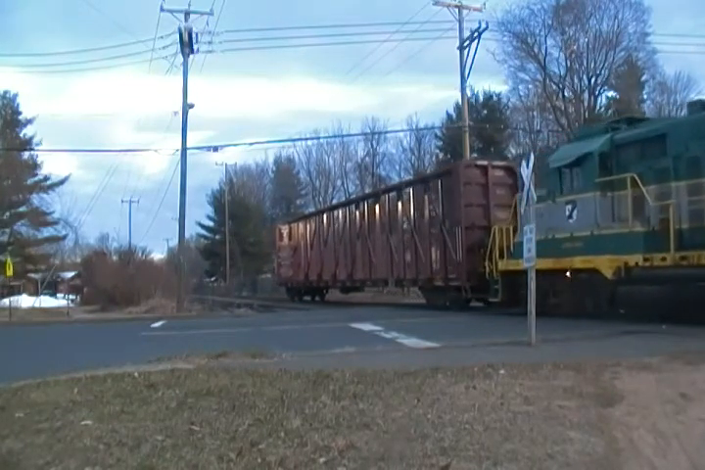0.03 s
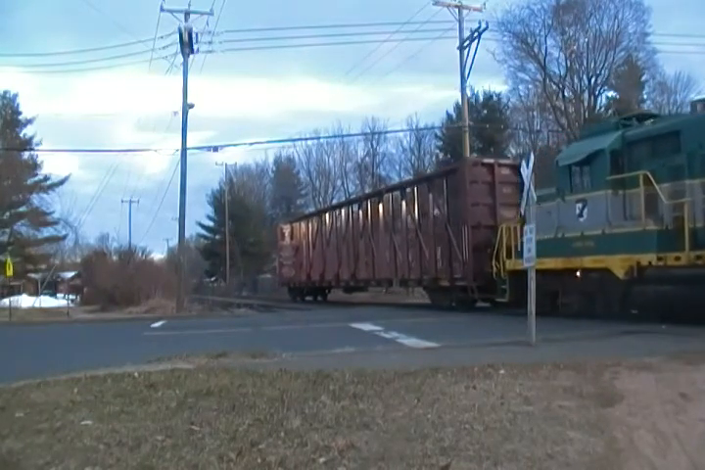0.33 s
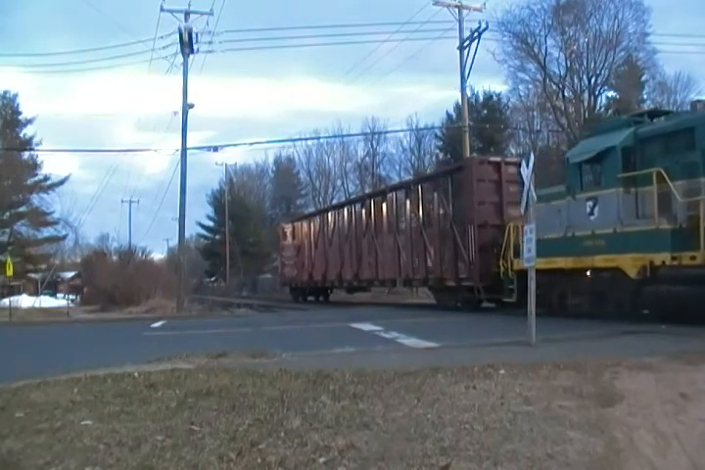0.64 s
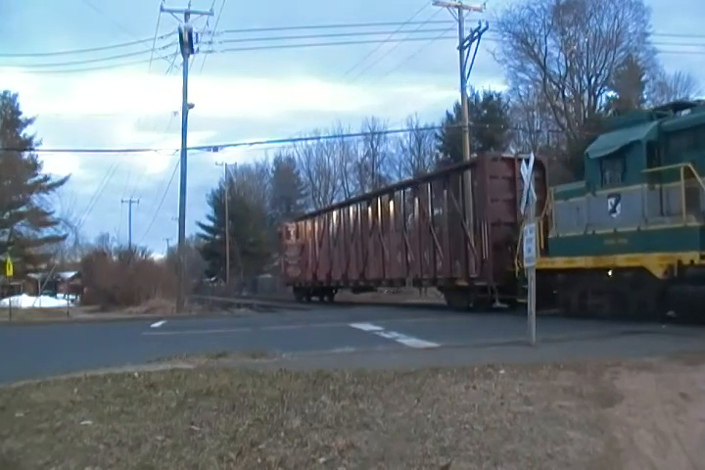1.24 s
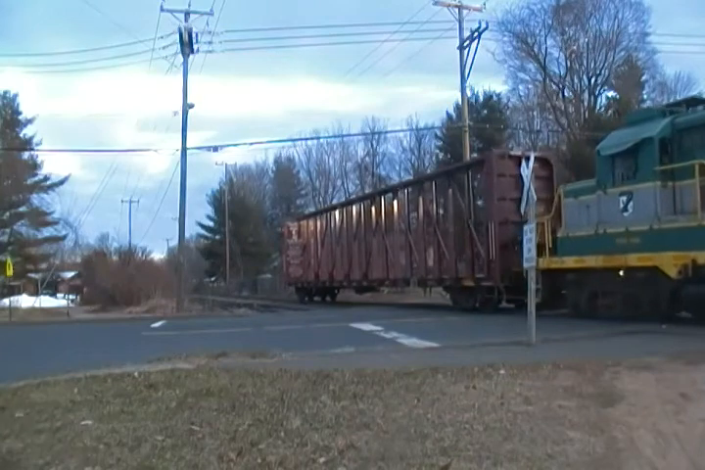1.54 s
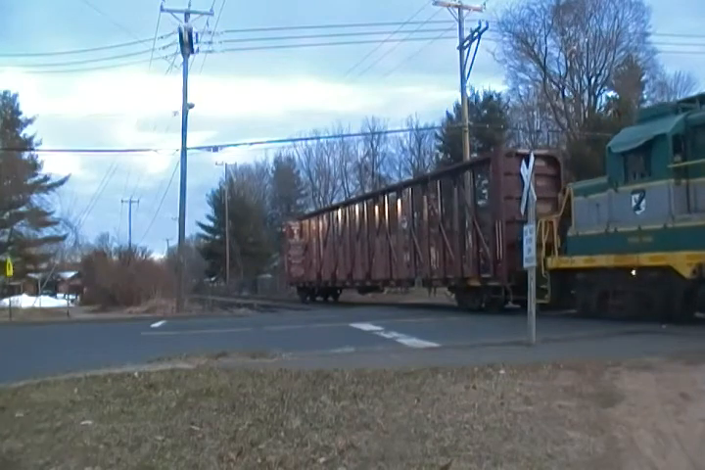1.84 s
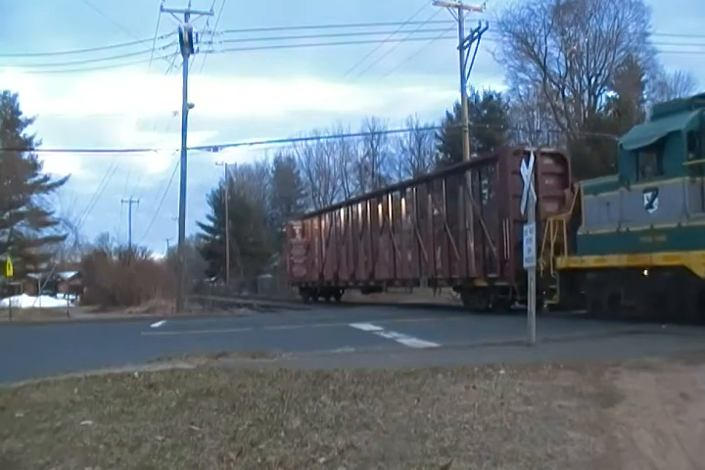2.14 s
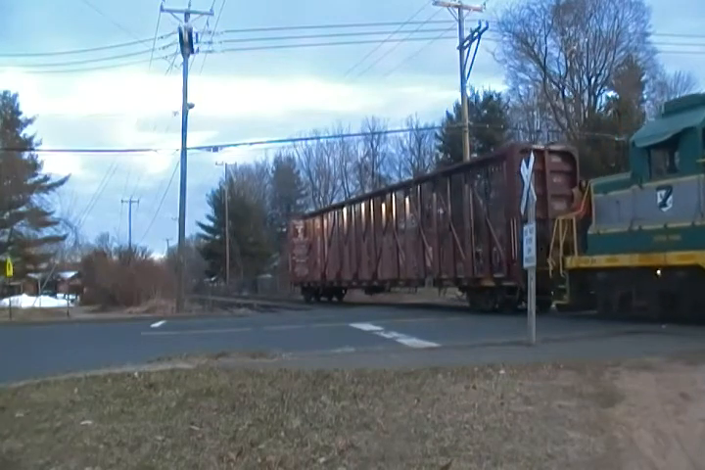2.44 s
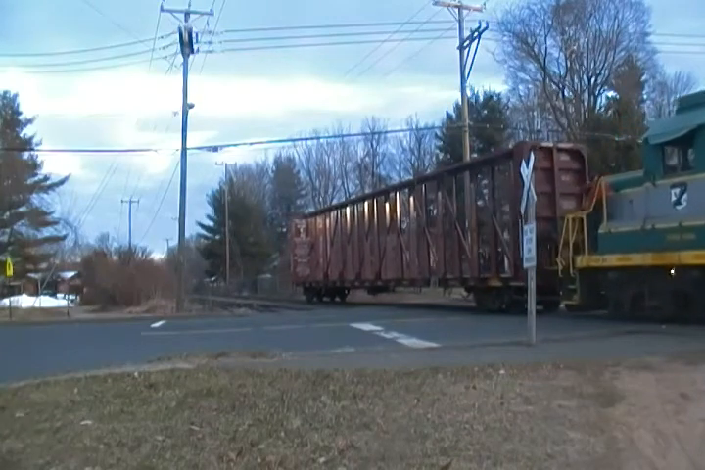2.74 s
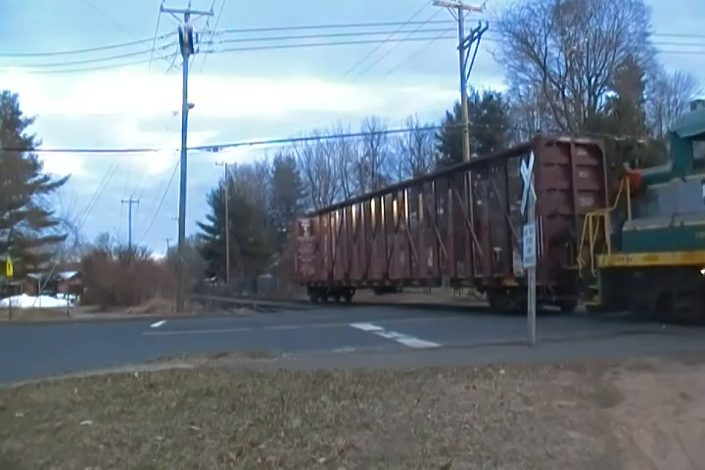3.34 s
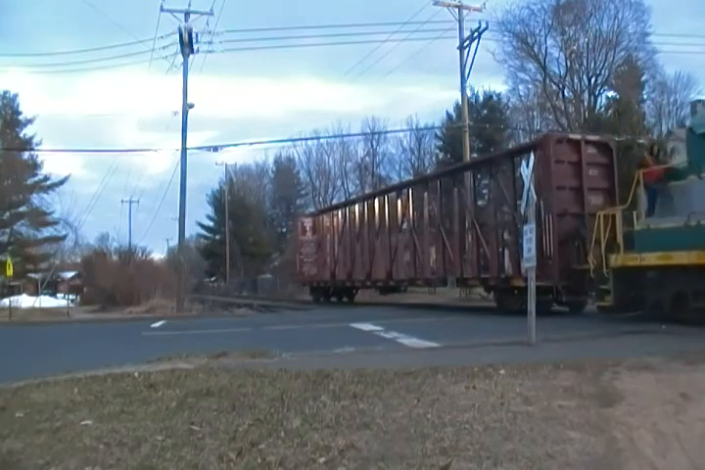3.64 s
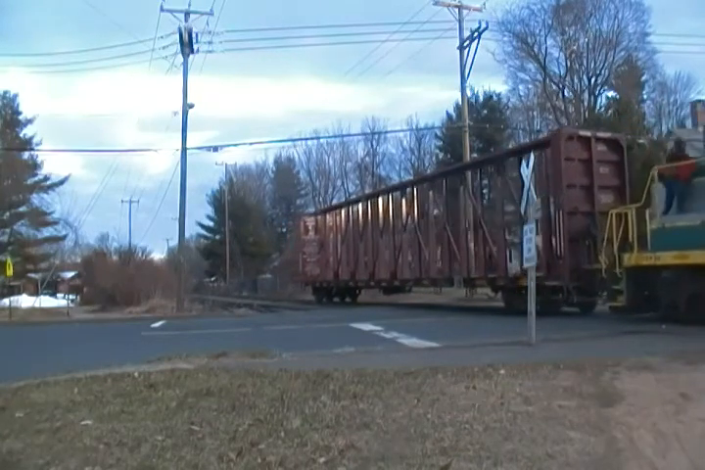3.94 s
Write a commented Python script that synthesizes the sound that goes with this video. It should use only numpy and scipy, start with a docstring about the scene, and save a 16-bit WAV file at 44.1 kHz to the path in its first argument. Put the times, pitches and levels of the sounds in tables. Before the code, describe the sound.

A diesel locomotive throbs and slowly speeds up while its bell rings in even strokes.

```python
"""A diesel locomotive creeps over a road crossing with a freight car, heard from the roadside in open air.
The engine slowly speeds up: eight uneven firings per cycle make a deep throb with puffs of exhaust noise,
while a blower whine and a hiss climb with it. The bell strikes about every 0.63 s: a clapper knock, then
beating pairs of modes over a lasting hum. One faint, high squeak passes."""
import sys
import numpy as np
from scipy import signal
from scipy.io import wavfile

SR = 44100
rng = np.random.default_rng(int(sys.argv[2]) if len(sys.argv) > 2 else 0)


def int16_out(signal):
    """Quantize to a 16-bit WAV file."""
    q = np.round(np.clip(np.atleast_2d(signal).T, -1, 1) * 32767)
    wavfile.write(sys.argv[1], SR, q.astype(np.int16))


N = 176400
T = np.arange(N) / SR
CYLINDERS, FIRING_PEAK = 8, 0.637  # peak as a fraction of the firing period
SIDE = np.array([[1], [-1]])

# Bell strokes. Each row: start in seconds, level in dB, ring time factor, extra dB of clang, strike note,
# chime and treble, strike note's twin mode in dB, extra treble pan in dB L-R.
STROKES = [(-.37, 3.5, 1.01, 0, -3.5, -2, -2.3, -8, 3), (0.2646, -1.5, 1.07, -4.5, 1, -5.5, -4, -14.5, 2.5),
           (0.8982, -0.5, 0.95, 0, -3, -3, 0.99, -3, 1.5),
           (1.543, -0.5, 1.094, -10, -7.5, 2, 0.078, -19, -5),
           (2.179, -3, 0.96, -6, -3.5, 1.5, 2.2, -5, 0.5),
           (2.8071, -1.5, 1.14, -9.5, -3, 7, 0.71, -6.5, 1.5),
           (3.4335, 0.5, 0.74, 1, -4.5, 7, 4.2, -3, 1.5)]


def from_db(db):
    """Decibels to gain."""
    return 10 ** (np.asarray(db) / 20)


def unit_rms(x):
    """Scale to rms 1."""
    return x / np.sqrt(np.mean(np.abs(x) ** 2) + 1e-20)


def in_time(rows):
    """Breakpoints interpolated at every sample."""
    return np.interp(T, *np.transpose(rows))


def at_hz(rows, hz):
    """Breakpoints interpolated over log frequency."""
    row_hz, values = np.transpose(rows)
    return np.interp(np.log(hz), np.log(row_hz), values)


def pan(db):
    """Stereo gains for an L-R level difference."""
    return from_db(SIDE * db / 2)


def drift(rate_hz):
    """Slow random signal, rms 1."""
    step, settle = 20, 4000
    pole = np.exp(-2 * np.pi * step * rate_hz / SR)
    white = rng.standard_normal(N // step + settle + 2)
    slow = signal.lfilter([1], [1, -2 * pole, pole * pole], white)[settle:]
    return np.interp(np.arange(N) / step, np.arange(len(slow)), unit_rms(slow))


def flutter(rate_hz):
    """Random amplitude and phase, rms 1."""
    return unit_rms(drift(rate_hz) + 1j * drift(rate_hz))


def banded_noise(spectrum, flicker_db):
    """Stereo noise in separately flickering third octaves, rms 1."""
    # Each row: frequency in Hz, L-R correlation.
    correlation = [(60, 0.99), (300, .9993), (1000, 0.99), (2500, 0.89), (5000, 0.6), (10000, 0)]
    edges_hz = 20 * 2 ** np.arange(0, 9.5, 1 / 3)
    out, white = 0, rng.standard_normal((2, 2, N))
    for k, (low, high) in enumerate(zip(edges_hz, edges_hz[1:])):
        if spectrum[0][0] < high and low < spectrum[-1][0]:
            hz = np.sqrt(low * high)
            band = signal.butter(2, [low, high], "band", fs=SR, output="sos")
            mid, side = signal.sosfilt(band, white[k % 2])
            alike = at_hz(correlation, hz)
            gain = from_db(at_hz(spectrum, hz) + flicker_db * drift(5.9))
            out = out + gain * (np.sqrt(1 + alike) * mid + np.sqrt(1 - alike) * side * SIDE)
    return unit_rms(out)


def exhaust_tone(firings):
    """One pressure swing per firing; unequal cylinders make it throb, less so as it speeds up."""
    # Strength of each firing of a cycle in dB, before scaling by unevenness.
    cylinder_db = [-2, -4.5, -0.5, 1.5, 1, 0.15, 0.3, -2.5]
    # Each row: time in seconds, tone level in dB.
    tone_db = [(0, -15.5), (1.3, -14), (2.6, -13.8), (4, -14.5)]
    # Each row: time in seconds, second harmonic in dB re the first.
    overtone_db = [(0, -19), (1, -22.5), (2, -20.5), (2.8, -14), (3.3, -12), (4, -21)]
    position = firings - FIRING_PEAK
    unevenness = np.linspace(2, 1, N)
    throb_db = unevenness * np.interp(position, np.arange(CYLINDERS), cylinder_db, period=CYLINDERS)
    phase = 2 * np.pi * (position + 0.009 * drift(35))  # timing jitter
    wave = np.cos(phase) - from_db(in_time(overtone_db)) * np.sin(2 * phase)
    tone = np.sqrt(2) * wave * from_db(in_time(tone_db) + throb_db - 0.38 * drift(11))
    highpass = signal.butter(4, 39, "high", fs=SR, output="sos")
    return signal.sosfiltfilt(highpass, tone, padlen=SR // 10)


def engine_noise(firings):
    """Exhaust gas, machinery and rumble swell once per cycle; the gas also pulses with each firing."""
    # Spectra. Each row: frequency in Hz, relative density in dB.
    gas_spectrum = [(180, -3), (250, -9), (320, -3.5), (400, -0.5), (440, 3.5), (520, 1.5), (620, -3),
                    (720, -0.5), (800, -6), (900, -34.5), (1050, -37)]
    machinery_spectrum = [(600, 7.5), (900, 2), (1300, 0), (1700, 0), (2200, -1), (2800, -10.5),
                          (4000, -10.5), (5200, -22.5), (7000, -18), (8500, -30), (10500, -30.5),
                          (12000, -50)]
    rumble_spectrum = [(20, -34), (35, -18), (50, -6.5), (90, 3.5), (125, 0.5), (160, -8), (220, -14.5),
                       (320, -28)]
    # Envelopes. Each row: time in seconds, base level in dB.
    gas_db = [(0.0, -28), (0.05, -31), (0.62, -29), (0.65, -25.5), (1.04, -31.5), (1.05, -29),
              (2.36, -30.5), (3.39, -26), (4.0, -27)]
    machinery_db = [(0, -39.5), (1.2, -37), (2.2, -39.5), (2.8, -38), (3.35, -33), (3.6, -36), (4, -32.5)]
    rumble_db = [(0, -29.5), (.8, -28.5), (1.4, -26), (2.2, -31.5), (2.8, -33.5), (3.3, -26), (4, -24.5)]
    swell = np.cos(2 * np.pi * (firings / CYLINDERS - 0.31))
    pulse = np.cos(2 * np.pi * (firings - FIRING_PEAK))
    gas = banded_noise(gas_spectrum, flicker_db=1.5)
    machinery = banded_noise(machinery_spectrum, flicker_db=0.8)
    rumble = banded_noise(rumble_spectrum, flicker_db=-3.9)
    return (gas * from_db(in_time(gas_db) - 1.3 + 2 * swell + 1.5 * pulse)
            + machinery * from_db(in_time(machinery_db) + 2.3 * swell)
            + rumble * from_db(in_time(rumble_db) + 3.7 * swell))


def blower(firings):
    """Wavering whines and a narrow hiss, geared to the engine and growing as it nears."""
    # Each row: multiple of the firing rate, final level in dB.
    whines = [(19.75, -41.5), (29.62, -41), (49.4, -77), (70.3, -55)]
    whine_db_per_s, hiss_db_per_s, hiss_multiple = 6.5, 1.5, 106
    remaining_s = T[-1] - T
    whine = 0
    for multiple, db in whines:
        tone = (flutter(7.4) * np.exp(2j * np.pi * multiple * firings)).real
        whine += from_db(db - whine_db_per_s * remaining_s) * tone
    carrier = np.exp(2j * np.pi * hiss_multiple * firings)
    mid, side = [(flutter(130) * carrier).real for _ in range(2)]
    hiss = from_db(-56.5 - hiss_db_per_s * remaining_s) * (mid + 0.4 * side * SIDE)
    return np.sqrt(2) * (whine + hiss)


def bell_partial(hz, db, t60_s, split_hz, twin_db, pan_db, stroke_db, stroke_pan_db=0, twin_lag_s=0):
    """A beating mode pair; each stroke takes over from the last. Scattering makes high ones waver."""
    attack_s, takeover_s, bloom_s, bloom_gain = 0.0015, 0.03, 0.037, from_db(-16)
    starts_s, _, ring_factors = np.transpose(STROKES)[:3]
    ends_s = np.append(starts_s[1:], T[-1])
    strokes = np.broadcast(starts_s, ends_s, t60_s * ring_factors, stroke_db, twin_db, stroke_pan_db)
    ring = np.zeros((2, N), complex)
    for start_s, end_s, ring_s, level_db, beat_db, lean_db in strokes:
        live = slice(max(int(start_s * SR) + 1, 0), int((end_s + 10 * takeover_s) * SR))
        age_s = T[live] - start_s
        envelope = (1 - np.exp(-age_s / attack_s)) * from_db(db + level_db - 60 * age_s / ring_s)
        release = np.exp(-np.maximum(T[live] - end_s, 0) / takeover_s)
        bloom = (1 + bloom_gain * np.clip(age_s / bloom_s, 0, 1)) / (1 + bloom_gain / 2)  # slight swell
        pair = 1 + from_db(beat_db) * np.exp(-2j * np.pi * split_hz * (age_s - twin_lag_s))
        phasor = np.exp(2j * np.pi * rng.random())
        ring[:, live] += pan(pan_db + lean_db) * envelope * release * bloom * pair * phasor
    scatter = (flutter(10) + 0.97 * flutter(5) * SIDE) * hz / 10000
    return (ring * (1 + scatter) * np.exp(2j * np.pi * hz * T)).real


def bell():
    """Each stroke rings the partials in a slightly different mix."""
    # Each partial: frequency in Hz, level in dB, T60 in seconds, twin mode's split in Hz,
    # twin level in dB, pan in dB L-R.
    clang = (2088.5, -16.5, 0.37, 8.5, -22.5, -3)
    chime = (3897, -29.5, 1.4, 7, -18, -1)
    # Upper partials: frequencies in Hz, then rows of the other five columns.
    upper_hz = [3679, 5195, 5752, 5937, 5965, 6120, 7630, 7807, 8785, 9142, 9586, 9862, 10005, 10250, 10780,
                11712, 12270]
    upper_modes = [(-36, 1.49, 5, -10, 0), (-40.5, 0.46, 8.2, -20.5, -2), (-35, 1.03, 5, -20, -1.3),
                   (-45.5, .7, 5.4, -16.5, -5), (-43, 1.1, 4, -13.5, 2), (-54.5, 1.2, 2.1, 3, -2.5),
                   (-45.5, 1.1, 4.3, -11.5, 4), (-40, 1.27, 8, -23, 1), (-60, .45, 9, -18, 13),
                   (-58.5, 0.28, 7, -18, -2), (-53.5, 0.74, 7.2, -3, 2), (-59.5, 0.49, 6, -2.5, -0.5),
                   (-42.5, 1.02, 13, -12.5, 2.4), (-58.5, .6, 9, 0, 6), (-60.5, 0.71, 20, -8, 3),
                   (-79, .6, 9, -7.5, 3), (-73.5, .5, 9, -16, 4)]
    _, db, _, clang_db, strike_db, chime_db, treble_db, twin_db, treble_pan_db = np.transpose(STROKES)
    ring = bell_partial(*clang, db + clang_db) + bell_partial(*chime, db + chime_db)
    ring += bell_partial(hz=2356, db=-19.5, t60_s=1.47, split_hz=7.43, twin_db=twin_db, pan_db=-1,
                         stroke_db=db + strike_db, twin_lag_s=0.052)  # strike note
    for hz, mode in zip(upper_hz, upper_modes):
        is_treble = hz > 7000
        ring += bell_partial(hz, *mode, db + is_treble * treble_db, is_treble * treble_pan_db)
    return ring


def clapper():
    """A short knock of contact noise at each stroke."""
    # Each row: frequency in Hz, relative density in dB.
    knock_spectrum = [(500, -16), (1200, 13), (2200, 6), (4000, 5.5), (7000, -1), (10000, -41),
                      (12500, -49)]
    knock_db, t60_s = -31.5, 0.09
    envelope = sum((T >= start_s) * from_db(knock_db + db - 60 * np.abs(T - start_s) / t60_s)
                   for start_s, db, *_ in STROKES)
    return envelope * banded_noise(knock_spectrum, flicker_db=0.5)


def bell_hum(hz=1094.8):
    """The bell's lowest partial rings on between strokes, swelling and fading."""
    # Each row: time in seconds, level in dB.
    hum_db = [(0.0, -29), (0.27, -34), (0.36, -28), (0.83, -45.5), (0.91, -36.5), (0.95, -45), (1.2, -36),
              (2.16, -38.5), (2.19, -28), (2.46, -31.5), (2.77, -54.5), (2.82, -34), (3.19, -32.5),
              (3.48, -37), (3.51, -41), (3.59, -36), (3.93, -31.5), (4.0, -46)]
    return np.sqrt(2) * from_db(in_time(hum_db) + 2 * drift(16)) * np.sin(2 * np.pi * hz * T)


def squeak(at_s=2.32, width_s=0.022, hz=10750):
    """One faint, very high squeak, perhaps from the running gear."""
    envelope = from_db(-50) * np.exp(-((T - at_s) / width_s) ** 2)
    return envelope * (flutter(130) * np.exp(2j * np.pi * hz * T)).real


def scene():
    """Engine, bell and squeak, slightly left."""
    # Engine speed. Each row: time in seconds, firings per second.
    firing_hz = [(0.0, 51.1), (0.6, 53.87), (1.3, 56.79), (2.0, 59.59), (2.7, 62.34), (3.4, 65.05),
                 (4.0, 66.85)]
    firings = np.cumsum(in_time(firing_hz)) / SR
    engine = exhaust_tone(firings) + engine_noise(firings) + blower(firings)
    return pan(0.5) * (engine + bell() + clapper() + bell_hum() + squeak())


def record(dry):
    """Steep low-pass at 12360 Hz."""
    return signal.sosfilt(signal.ellip(10, 0.1, 80, 12360, fs=SR, output="sos"), dry)


dry = scene()
out = record(dry)
int16_out(out)
```